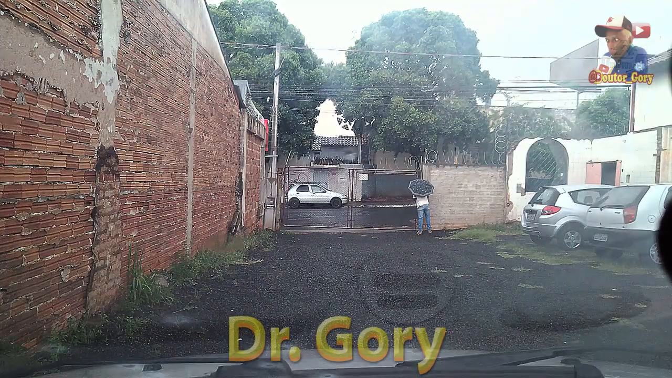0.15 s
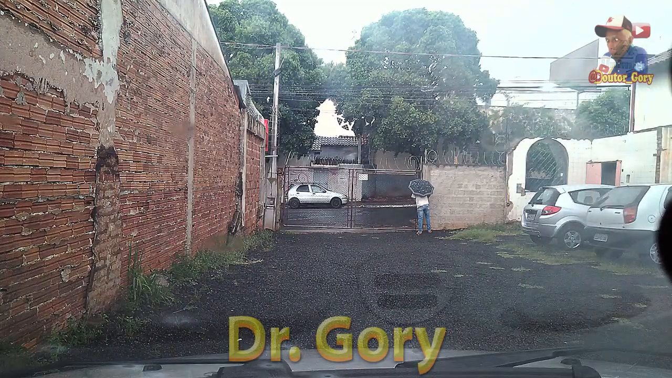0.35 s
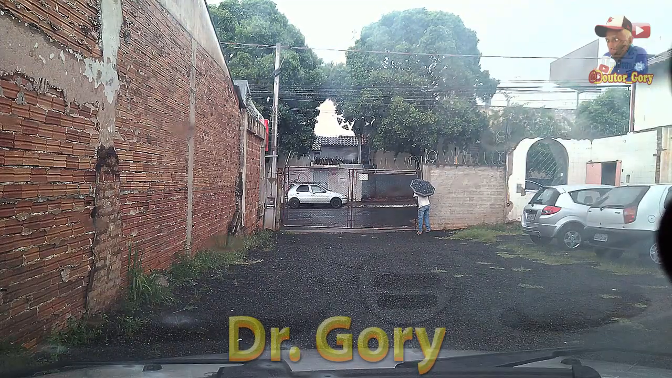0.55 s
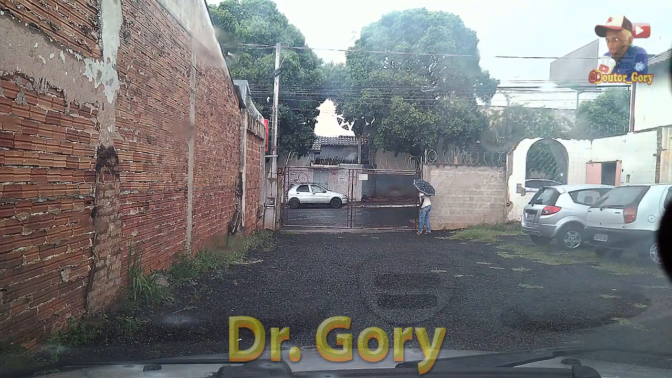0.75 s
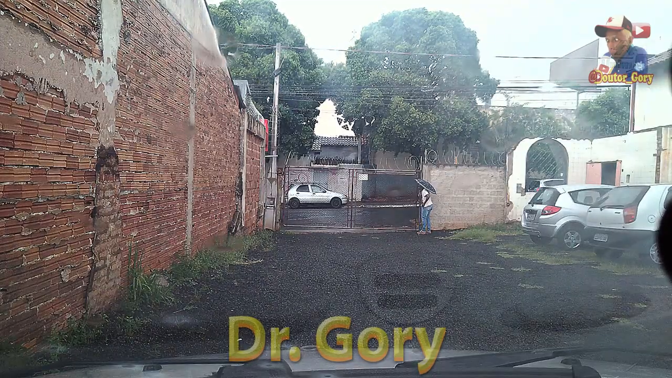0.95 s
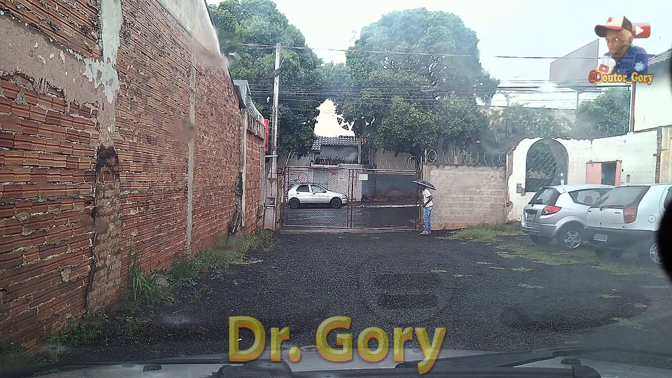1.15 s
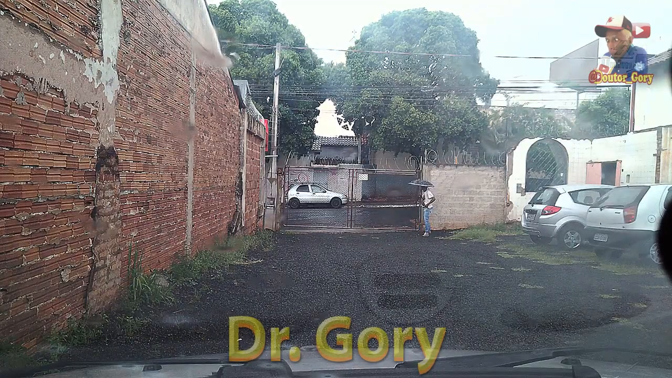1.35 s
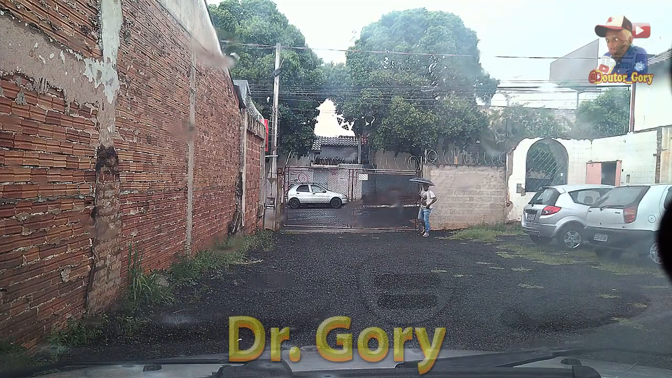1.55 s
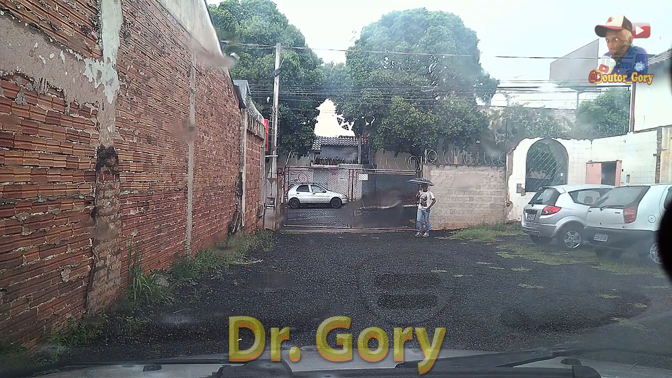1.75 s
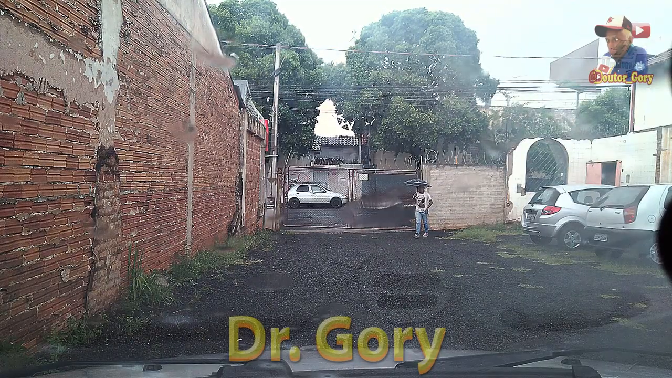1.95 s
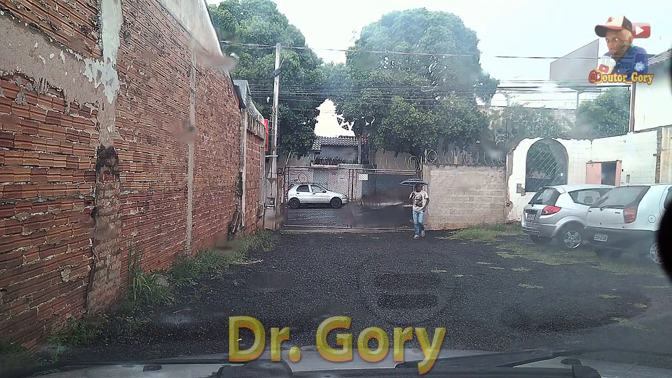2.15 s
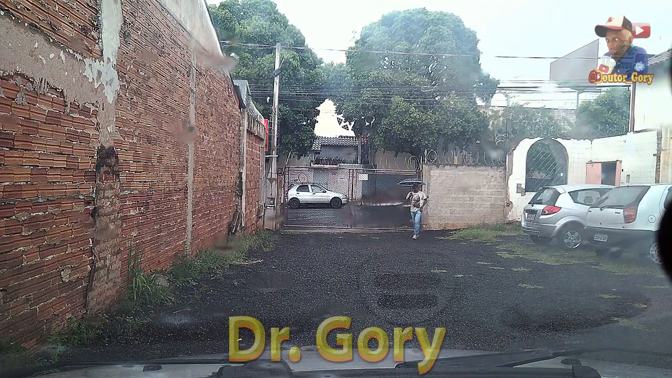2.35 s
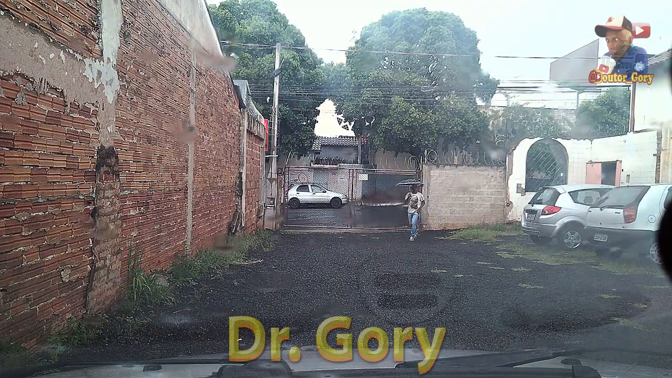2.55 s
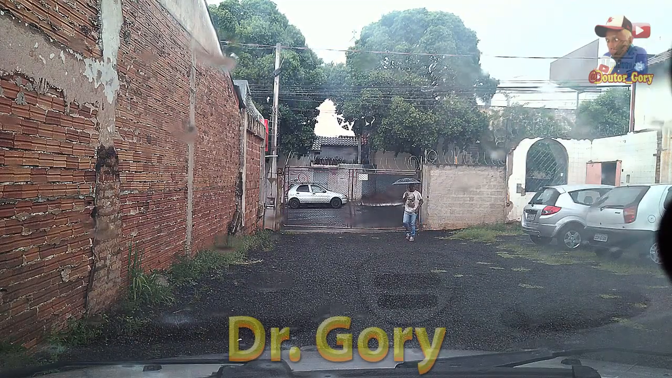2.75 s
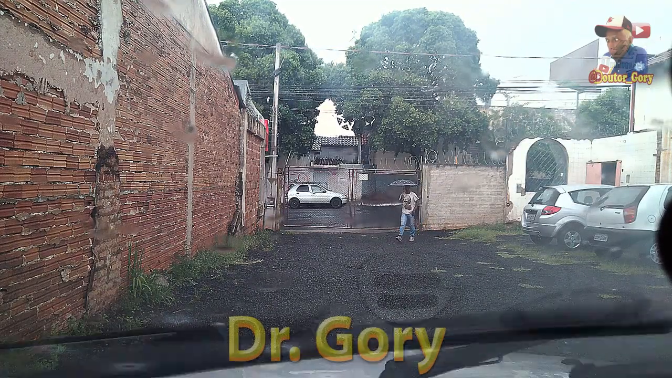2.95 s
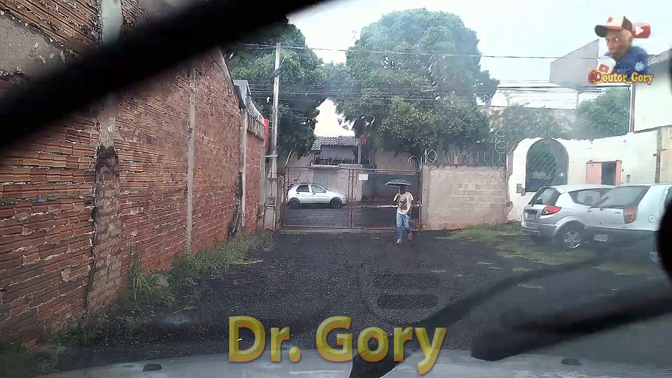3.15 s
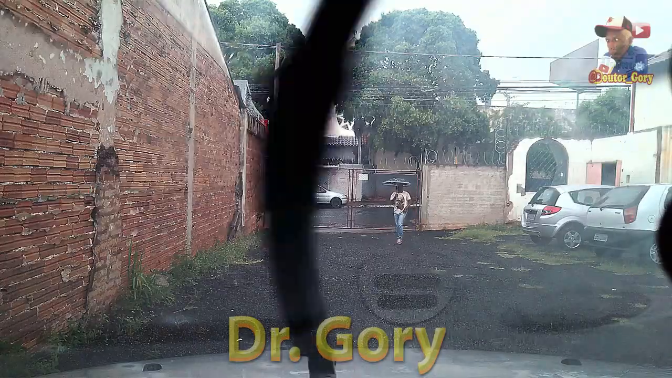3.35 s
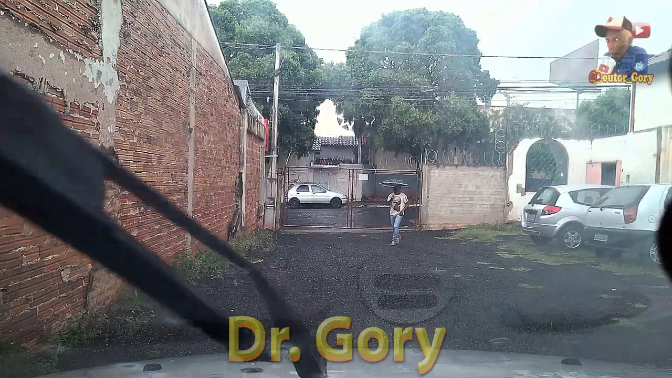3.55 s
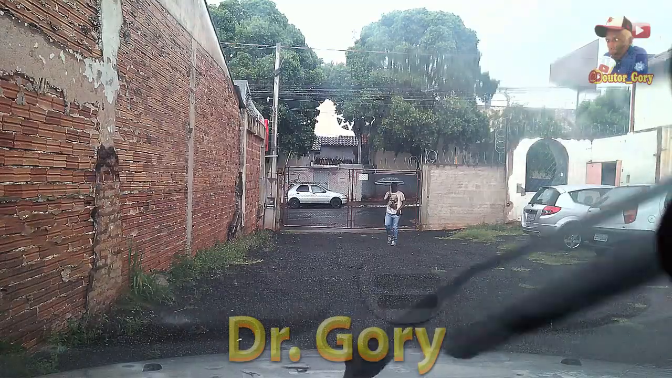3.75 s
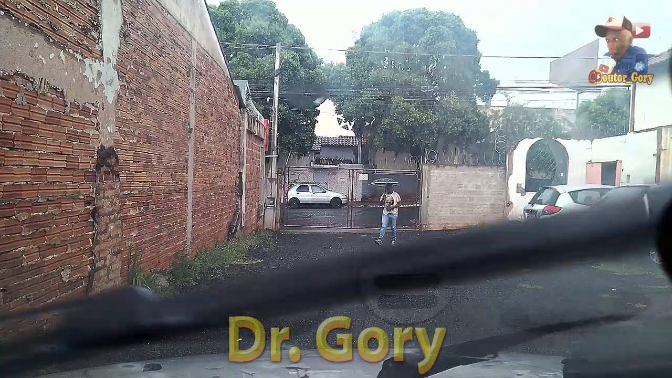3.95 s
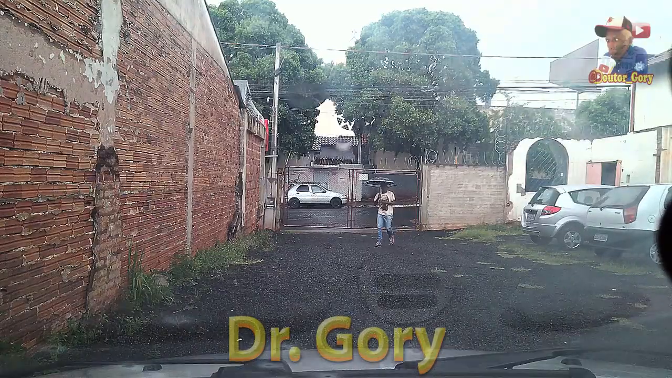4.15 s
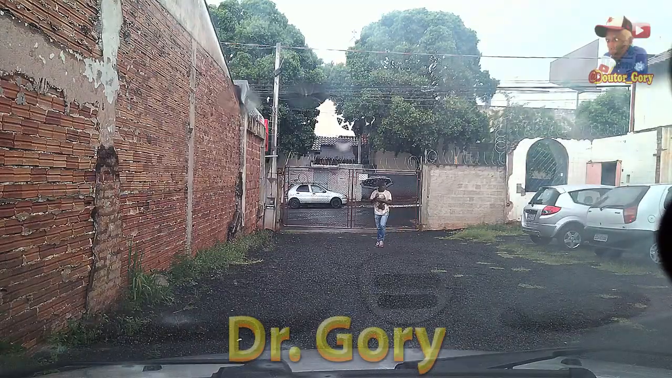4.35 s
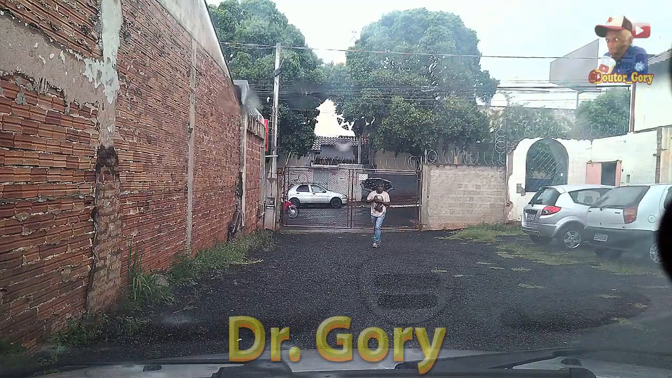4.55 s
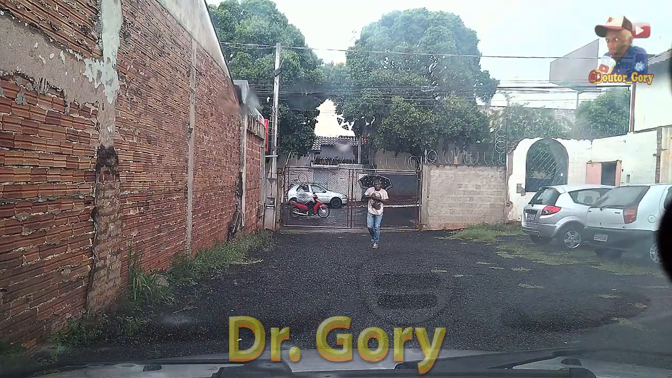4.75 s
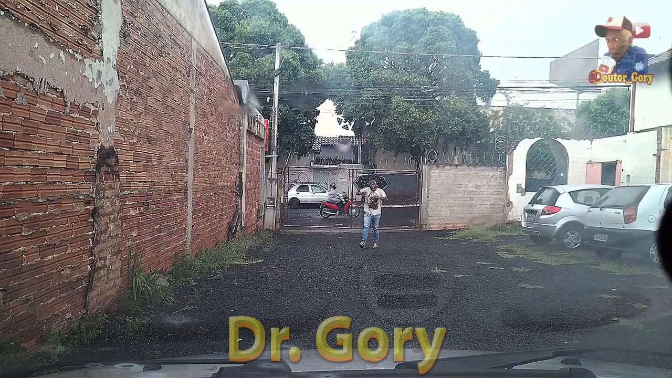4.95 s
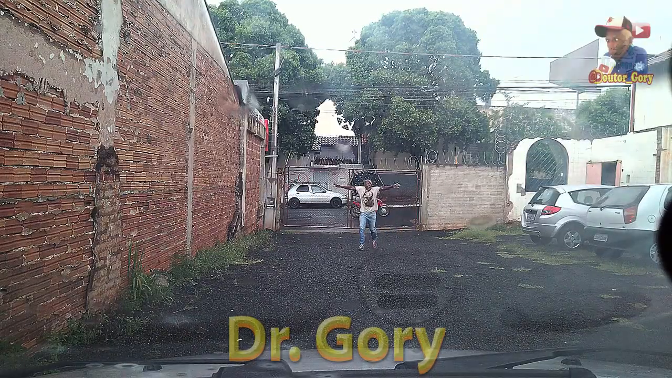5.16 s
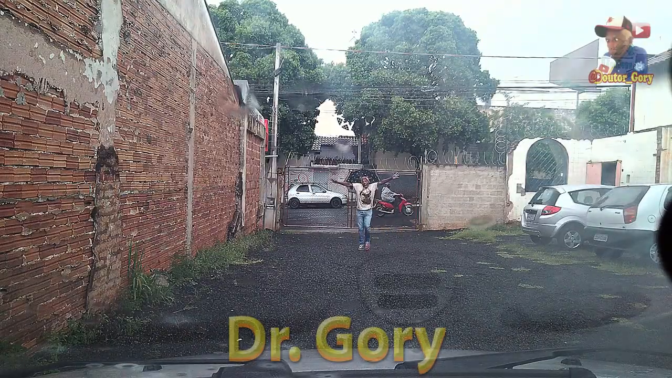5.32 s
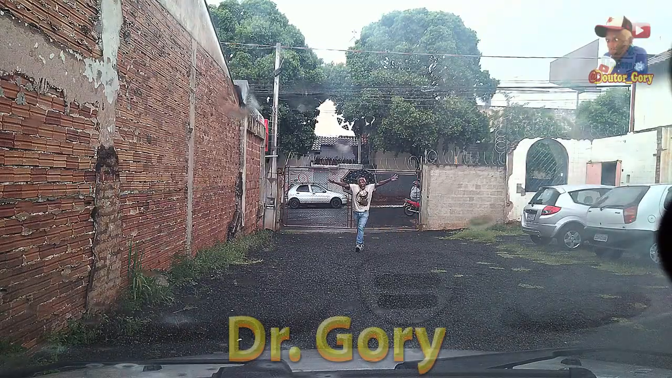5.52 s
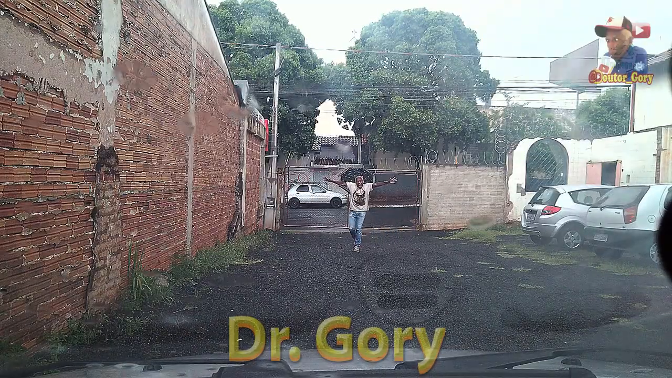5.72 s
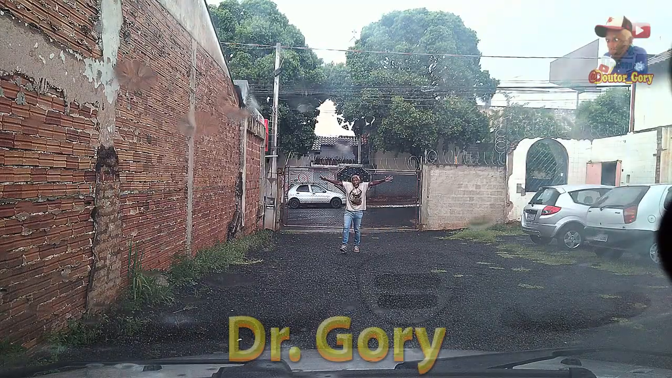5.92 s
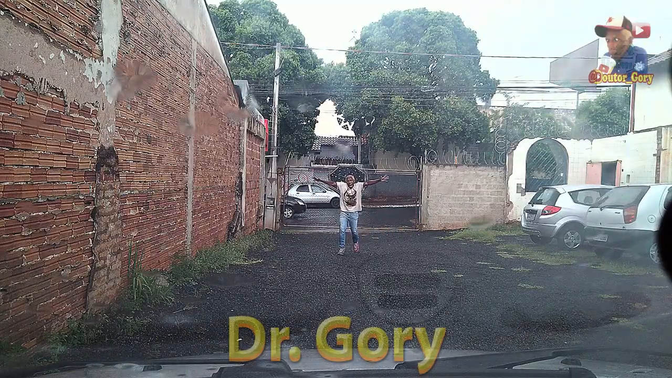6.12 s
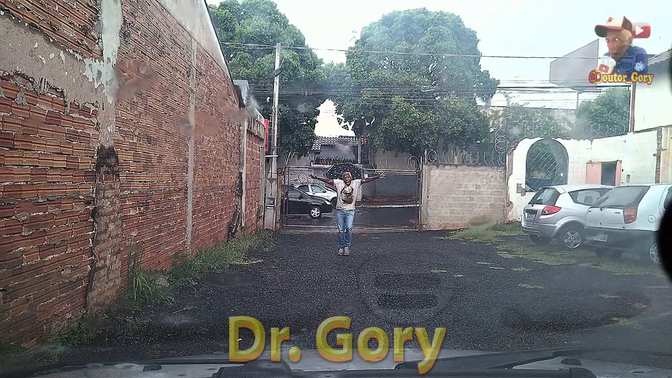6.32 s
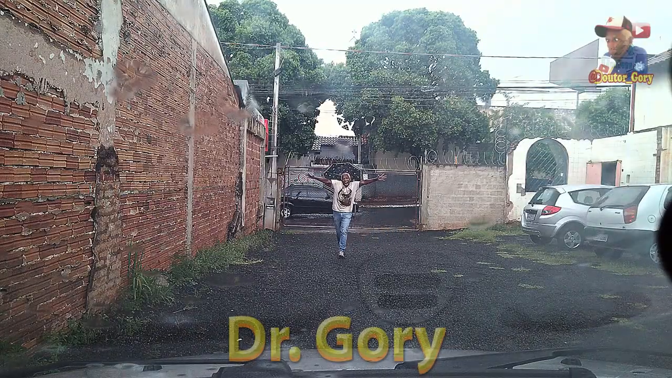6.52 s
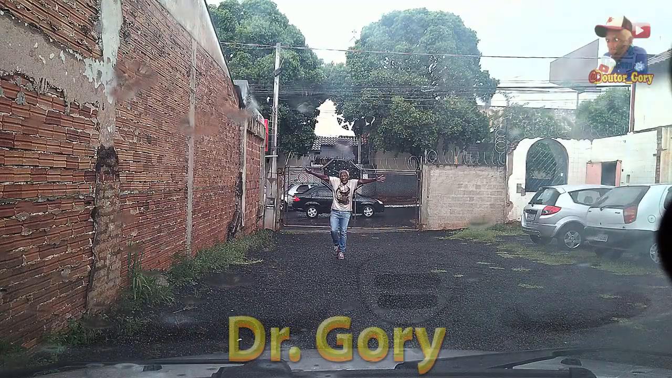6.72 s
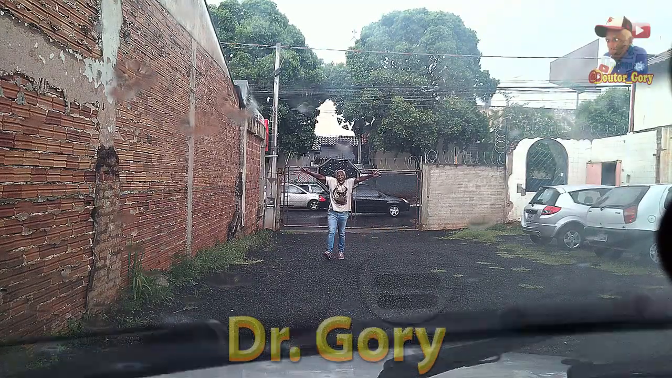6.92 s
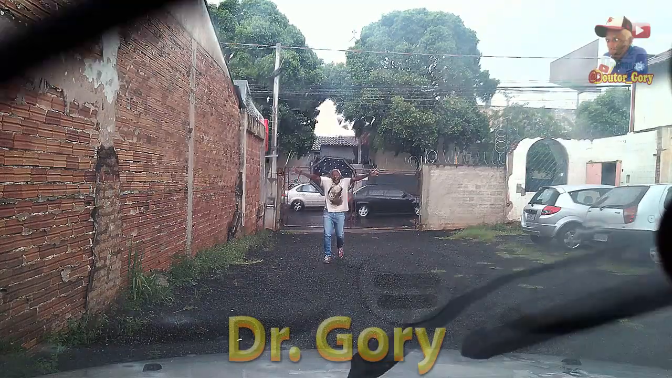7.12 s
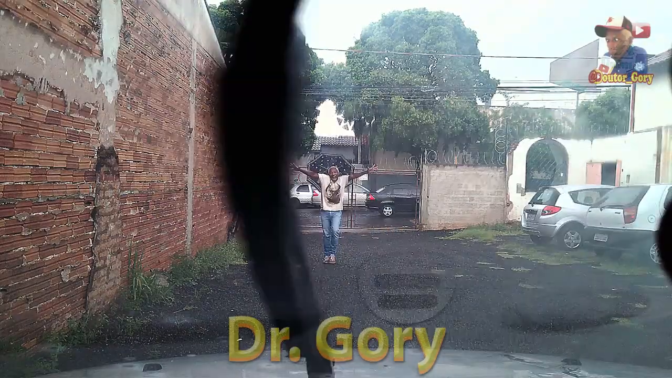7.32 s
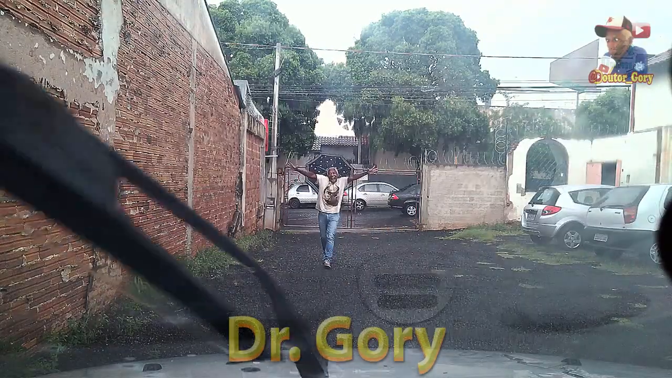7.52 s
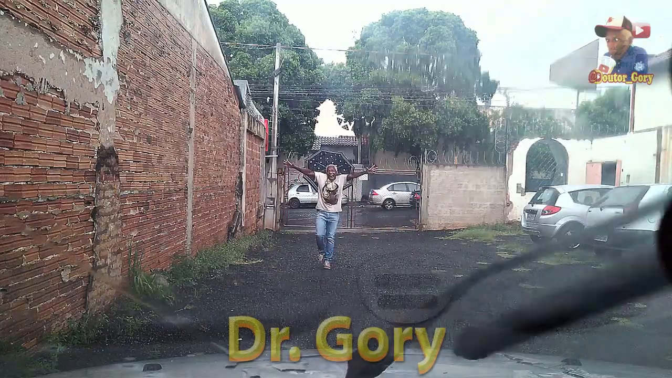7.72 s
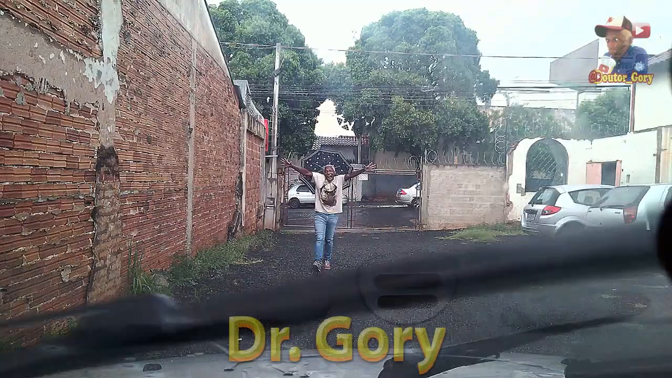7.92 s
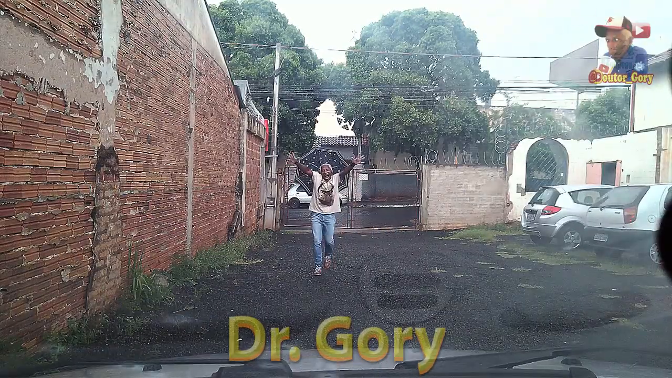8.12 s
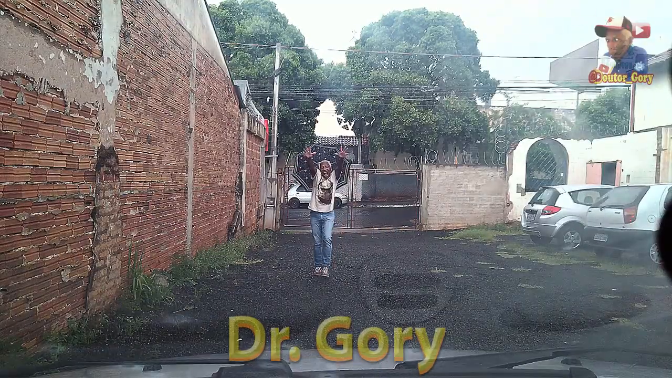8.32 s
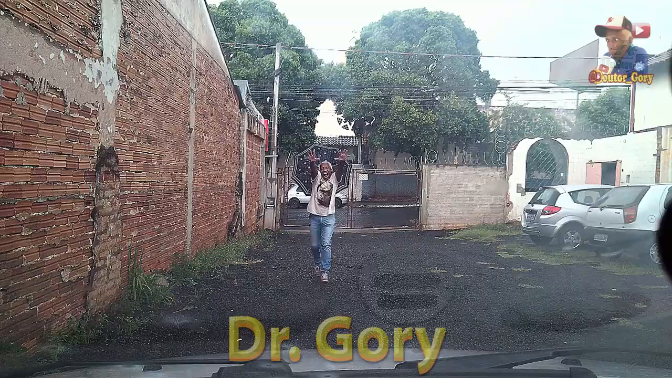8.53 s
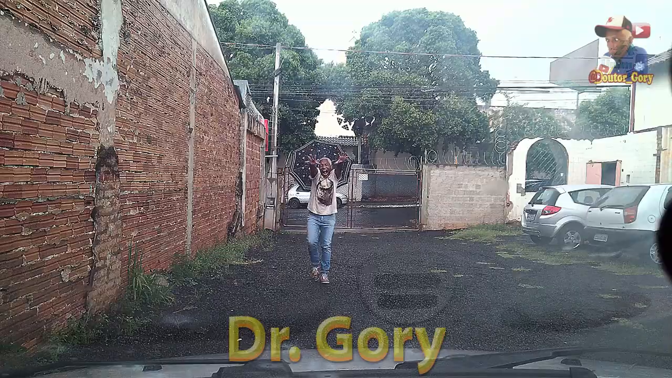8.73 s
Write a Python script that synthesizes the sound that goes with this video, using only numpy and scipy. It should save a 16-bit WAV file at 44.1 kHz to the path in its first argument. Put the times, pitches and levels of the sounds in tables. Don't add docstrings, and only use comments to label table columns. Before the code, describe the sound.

Heard from inside a small padded parked car: a steady dull rain wash, single drops thudding on the roof and ticking on the windshield, over a faint thin fan hum. A wiper sweep ends right at the start with a low thump; two more follow about four seconds apart, each with a relay tick, motor groan, juddering wet rubber, short squeaks and knocks at the turn.

```python
import sys
import numpy as np
from scipy import signal
from scipy.io import wavfile
from scipy.ndimage import uniform_filter1d

SR = 44100
rng = np.random.default_rng(int(sys.argv[2]) if len(sys.argv) > 2 else 0)


def transcribe(signal):
    frames = np.atleast_2d(signal).T
    limited = np.clip(frames, -1, 1)
    pcm = np.round(limited * 32767).astype(np.int16)
    wavfile.write(sys.argv[1], SR, pcm)


def volts(x):
    e = np.asarray(x, float) / 20
    return 10 ** e


N = 391608


def rms_one(x):
    return x / np.sqrt(np.mean(x ** 2) + 1e-20)


def during(x, fade):
    t = np.arange(x.shape[-1]) / SR
    return x * np.clip(np.minimum(t, t[::-1]) / fade, 0, 1)


def at_hz(points, hz):
    rows = np.array(points, float)
    return np.interp(np.log(hz), np.log(np.maximum(rows[:, 0], 1)), rows[:, 1])


def panned(x, pan_db):
    return np.array([x * volts(pan_db / 2), x * volts(-pan_db / 2)])


def bandpass(order, low_hz, high_hz):
    return signal.butter(order, [low_hz, high_hz], "band", fs=SR, output="sos")


def drift(rate):
    r = np.exp(-80 * np.pi * rate / SR)
    slow = signal.lfilter([1], [1, -2 * r, r * r], rng.standard_normal(N // 40 + 2002))[2000:]
    return np.interp(np.arange(N) / 40, np.arange(len(slow)), rms_one(slow))


def ring(clicks, hz, t60):
    r, w = volts(-60 / (t60 * SR)), 2 * np.pi * hz / SR
    return signal.lfilter([0, np.sin(w)], [1, -2 * r * np.cos(w), r * r], clicks + 1e-18)


def resonance(x, hz, width):
    r = np.exp(-np.pi * width / SR)
    poles = [1, -2 * r * np.cos(2 * np.pi * hz / SR), r * r]
    return signal.lfilter(np.array([1, 0, -1]) * (1 - r * r) / 2, poles, x)


def small_drops(per_s, spread_db, pan_db):
    born = rng.random(N) < per_s / SR
    energy = born * volts(2 * spread_db * np.minimum(rng.exponential(1, N), 2.5))
    return panned(energy, 2 * pan_db * rng.standard_normal(N)) / energy.mean()


def clear_drops():
    # (time [s], peak [dB], left-right [dB])
    dull = [(0.4304, -38, 1.5), (0.5615, -38, 4), (0.6524, -46, -1), (0.756, -41, 3.5), (1.1835, -38.5, 2),
            (1.2788, -37.5, -1), (1.5264, -35.5, 0), (1.577, -36, 0), (1.839, -41, 2), (2.32, -36.5, -0.5),
            (2.581, -40, -1), (2.812, -33.5, 2), (2.866, -36.5, 2), (3.2725, -36, 5), (3.6016, -53, -5),
            (3.8232, -38.5, 7), (3.9875, -40.5, 2), (4.0343, -38, -3.5), (4.1608, -37, 4), (5.248, -42, 9),
            (5.6992, -34, 0)]
    # (time [s], peak [dB], left-right [dB])
    bright = [(0.2049, -40, 0), (0.9317, -39.5, -1), (0.9991, -51, 7), (1.509, -45.5, 6), (1.762, -53, 4),
              (2.7663, -47, 14), (3.3814, -46, 5), (3.4185, -38.5, -3.5), (3.7915, -45, 1),
              (3.9367, -49, 6), (4.549, -42.5, 5), (4.602, -41, 1), (5.3738, -37, 0.5), (5.4318, -42.5, 6),
              (5.534, -36.5, 2), (5.5924, -38.5, 3), (5.7301, -35.5, -2), (5.778, -37.5, 1),
              (5.8755, -38, -1), (5.941, -41, -5), (5.9908, -36.5, 0.5), (6.0852, -40.5, -1),
              (6.1942, -42, 0), (6.453, -40.5, -4), (6.6285, -50, 0), (7.658, -42, -2.5), (7.714, -44, -3),
              (7.8795, -31, 2), (8.4718, -34, 1), (8.7041, -37.5, -1)]
    # (time [s], peak [dB], highs [dB], left-right [dB])
    specks = [(0.2185, -38, -10.5, -1), (0.515, -44, -14, 0), (0.61, -50, -13, 0), (0.69, -40, -13, -0.5),
              (1.054, -57, -8, -1), (1.621, -38.5, -12, 1), (1.8056, -54, -11, 8), (2.879, -38, -20, -1),
              (3.495, -42, -11, 3), (3.705, -43, -11.5, -2), (4.628, -59, -8, -3.5), (5.318, -41, -14, 0),
              (5.574, -46.5, -19, 0), (5.61, -46, -8, -3), (6.002, -32, -13.5, -1), (6.1709, -44, -10.5, 7),
              (6.2996, -48.5, -10, 4), (6.465, -33, -13.5, 1), (6.7301, -51, -17.5, 4),
              (6.848, -41.5, -27, 0), (7.231, -41, -11, 2), (7.425, -38, -8.5, 0), (7.492, -46, -13, -1),
              (7.757, -36, -16.5, 0), (8.7626, -56, -10, 1.5)]
    # (time [s], peak [dB])
    splashes = [(0.799, -36), (0.82, -35.5), (0.8375, -40.5), (1.398, -44), (4.37, -38), (4.516, -61),
                (5.168, -40.5), (5.442, -34), (5.567, -36), (7.307, -38.5), (7.3537, -60), (7.41, -38.5),
                (7.7407, -36), (7.907, -38), (8.3727, -39), (8.421, -35), (8.566, -39), (8.6265, -39),
                (1.077, -39.5), (1.238, -36.5), (2.173, -37.5), (4.662, -35.5), (4.767, -36.5),
                (5.003, -35), (5.129, -35.5), (5.301, -40.5), (5.49, -45), (5.895, -33), (7.545, -39),
                (7.665, -41)]
    rows = [(s, db, -13, pan_db, 0) for s, db, pan_db in dull]
    rows += [(s, db, -11.5, pan_db, 0) for s, db, pan_db in bright]
    rows += [(*row, 0) for row in specks]
    rows += [(s, db, -13, 1, 1) for s, db in splashes]
    return np.transpose(rows)


def rain():
    # (time [s], patter [dB], rumble [dB])
    swells = [(0.3, -52.5, -52.5), (1, -52.5, -58), (1.7, -50.5, -52), (2.3, -54.5, -56.5), (3.5, -53, -45),
              (4.498, -53, -51.5), (5.1, -52, -52), (5.8, -52, -53.5), (6.4, -51.5, -49.5),
              (7.4, -50, -41.5), (8.1, -53.5, -46.5), (8.6, -51, -49.5)]
    # (frequency [Hz], density [dB per Hz])
    wash = [(18, -36), (30, 2), (144, 3.5), (214, -13.5), (423, -6), (977, -20.5), (2260, -27),
            (4240, -34.5), (7940, -45.5), (12400, -40), (14500, -58.5), (15700, -73)]
    # (frequency [Hz], density [dB per Hz])
    patter = [(200, -19.5), (400, -15.5), (750, -15), (1000, -19), (2300, -23), (4200, -28.5),
              (6500, -39.6), (11000, -45), (15700, -48.5)]
    # (frequency [Hz], t60 [s])
    roof_t60 = [(300, 0.23), (2000, 0.094), (5000, 0.062), (12000, 0.076)]
    # (frequency [Hz], likeness [-1 to 1])
    likeness = [(50, 0.94), (120, 0.94), (350, 0.82), (700, 0.31), (1200, -0.25), (3000, 0.035),
                (12000, -0.13)]
    # (frequency [Hz], left-right [dB])
    lean = [(60, 1), (300, 2.5), (2000, 1), (5000, 1.5), (9000, 0)]
    wash_db, flicker_db = -49, 1.6
    splash_spread_s = 0.007

    t = np.arange(N) / SR
    s, patter_db, rumble_db = np.transpose(swells)
    rumble_db = np.interp(t, s, rumble_db) + 48.0
    small = small_drops(per_s=240.0, spread_db=2.9, pan_db=0.5) * volts(2 * np.interp(t, s, patter_db))
    s, peak_db, high_db, pan_db, soft = clear_drops()
    at = (s * SR).astype(int)
    hard = np.ones(N)
    hard[at] = 1 - soft
    spread = np.exp(-1 / (splash_spread_s * SR))
    colour = rng.standard_normal((len(s), 24))
    edges = 30 * 2 ** np.arange(0, 9.1, .5)
    white, gust, out = rng.standard_normal((2, 2, N)), drift(2.5), 0
    for k, (low, high) in enumerate(zip(edges, edges[1:])):
        hz, band = np.sqrt(low * high), bandpass(2, low, high)
        mid, side = signal.sosfilt(band, white[k % 2])
        alike = np.clip(at_hz(likeness, hz), -1, 1)
        noise = np.sqrt(1 + alike) * mid + np.sqrt(1 - alike) * side * [[1], [-1]]
        power = volts(2 * (wash_db + at_hz(wash, hz) + 20.0 + 0.59 * gust + flicker_db * drift(7.1)))
        tick = 0
        if hz < 110:
            power = power * volts(2 * rumble_db)
        if hz > 170:
            keep = volts(-120 / (at_hz(roof_t60, hz) * SR))
            swell = np.exp(-hz / (2.5 * SR))
            bright = np.clip(np.log2(hz / 1500) / 0.52, -.5, 1.3)
            big = np.zeros((2, N)) + 1e-12
            big[:, at] = panned(volts(peak_db + bright * (high_db + 13.5) + 2.0 * colour[:, k]), pan_db)
            splash = signal.lfilter([1 - spread], [1, -spread], big ** 2 * (1 - hard) + 1e-24)
            kicks = small * (1 - keep) * volts(2 * 8.63)
            kicks = kicks + volts(2 * 2.46) * (big ** 2 * hard + volts(2.0) * splash)
            ringing = signal.lfilter([1 - swell], np.convolve([1, -keep], [1, -swell]), kicks)
            power = power + ringing * volts(2 * at_hz(patter, hz) + 2 * 18.57)
            tick = signal.sosfilt(band, big * hard + 1e-12) * volts(at_hz(patter, hz) + 40.5)
        ears = volts(at_hz(lean, hz) * np.array([[.5], [-.5]]))
        out = out + (noise * np.sqrt(power) + tick) * ears
    return out


def fan():
    phase = 2 * np.pi * np.cumsum(263.8 + 0.63 * drift(2.44)) / SR
    return panned(np.sqrt(2) * volts(-58 + 0.73 * drift(3.7)) * np.sin(phase), -1.4)


def over_sweeps(rows):
    starts = [
        -1.19,
        2.785,
        6.764,
    ]
    # (motor [dB], drag [dB])
    efforts = [
        (2.5, 2),
        (-1.5, 0.3),
        (-1, 0.6),
    ]
    t, (s, *columns) = np.arange(N) / SR, np.transpose(rows)
    for start, gains_db in zip(starts, efforts):
        first, last = round((start + s[0]) * SR), round((start + s[-1]) * SR)
        span = slice(max(first, 0), min(last, N))
        yield span, [np.interp(t[span] - start, s, c) for c in columns], gains_db


def motor():
    # (time after start [s], pitch [Hz], tone [dB])
    course = [(0.0, 91.1, -41), (.13, 58.93, -37), (.25, 89.57, -31.5), (.48, 59.66, -48), (.68, 80.3, -43),
              (.9, 58.15, -39), (1.26, 60, -52.5), (1.44, 92.4, -40), (1.62, 57, -57)]
    out, wobble, throb = np.zeros(N), drift(22), drift(39)
    for span, (hz, level_db), (gain_db, _) in over_sweeps(course):
        phase = 2 * np.pi * np.cumsum(hz * (1 + 0.058 * wobble[span])) / SR
        tone = np.sqrt(2) * volts(level_db + gain_db + 2.7 * throb[span]) * np.sin(phase)
        out[span] = during(tone, .01)
    return panned(out, 1.9)


def friction():
    # (time after start [s], drag [dB])
    drag = [(0.0, -57), (.03, -33.5), (.19, -35.5), (.45, -39), (.56, -38.5), (.78, -36.5), (.95, -50.5),
            (1.15, -40), (1.63, -52.5)]
    # (peak time [s], judder [dB], bright part [dB], t60 [s])
    judders = [(0.004, -40.5, -46, 0.4), (0.25, -30.5, -33, 0.24), (2.99, -34, -47, .3),
               (3.021, -24, -31, 0.32), (3.094, -21, -27.5, 0.3), (3.13, -30.5, -25, 0.13),
               (3.44, -41, -42, 0.39), (3.52, -25.5, -35, 0.099), (3.628, -28, -39, 0.2),
               (4.222, -39, -36, 0.37), (6.784, -25.5, -42, 0.12), (6.988, -22, -24.5, 0.38),
               (7.09, -25.5, -29, 0.53), (7.183, -31.5, -29, 0.36), (7.41, -31, -33.5, 1),
               (7.599, -36.5, -38.5, 0.72), (8.198, -28, -33.5, 0.041)]
    bright_db, rise_db_per_s, bright_shorter = -10, 403, 2
    catch_s = 0.0082
    t, power = np.arange(N) / SR, np.full((2, N), 1e-12)
    for span, (drag_db,), (_, gain_db) in over_sweeps(drag):
        power[:, span] += during(volts(2 * (drag_db + gain_db + np.array([[0], [bright_db]]))), .0048)
    for s, low_db, high_db, t60 in judders:
        span = slice(max(round((s - .15) * SR), 0), round((s + .5) * SR))
        rise = rise_db_per_s * np.minimum(t[span] - s, 0)
        fall = 60 * np.maximum(t[span] - s, 0) / t60
        power[:, span] += volts(2 * np.array([low_db + rise - fall, high_db + rise - bright_shorter * fall]))
    return np.sqrt(uniform_filter1d(power, size=round(catch_s * SR)) + 1e-12)


def blades():
    # (frequency [Hz], width [Hz], level [dB])
    glass = [(144, 37, 0.5), (212.7, 17.8, 1.5), (272.3, 33, -5.5), (464, 210, 11.5), (576, 68, 12.5),
             (750, 103, 6.5), (980, 990, 0.5), (1210, 770, -3.5), (1720, 500, -15.5)]
    slips_per_s, hiss_db = 1500, -24
    slips = (rng.random((2, N)) < slips_per_s / SR) * rng.standard_normal((2, N)) * volts(2.6 * drift(32))
    slips = np.array([slips[0] + 0.5 * slips[1], slips[0] - 0.45 * slips[1]]) + 1e-18
    modes = [(-1) ** k * volts(db) * resonance(slips, hz, width) for k, (hz, width, db) in enumerate(glass)]
    low, high = friction()
    out = rms_one(sum(modes[:3])) * low * volts(-3.5) + rms_one(sum(modes[3:])) * high * volts(-4.5)
    soft_rubber = signal.butter(2, 2300, fs=SR, output="sos")
    hiss = rms_one(signal.sosfilt(bandpass(2, 1300, 3800), rng.standard_normal((2, N))))
    hiss = hiss * high * (high / high.max()) ** 0.5
    return (signal.sosfilt(soft_rubber, out) + volts(hiss_db) * hiss) * volts([[1.5], [-1.5]])


def knocks():
    # (time [s], peak [dB], frequency [Hz], t60 [s], left-right [dB])
    linkage = [(0.07, -31.5, 208, 0.091, 11), (0.223, -16.5, 99.4, 0.16, 2), (0.251, -11, 81, 0.03, 2),
               (2.792, -11.5, 123, 0.063, 1.5), (2.871, -21.5, 220, 0.14, 3), (3.201, -20.5, 345, 0.05, 5),
               (3.618, -18.5, 163, 0.07, 0), (3.643, -18, 91.7, 0.25, 2.5), (4.216, -27, 140, 0.093, 3),
               (6.772, -9.5, 134, 0.066, -1), (6.841, -27.5, 169, 0.08, 11), (6.985, -10.5, 220, 0.069, 13),
               (7.003, -6.5, 142, 0.039, -12), (7.591, -14.5, 276, 0.065, -4), (7.63, -18, 91, 0.18, 0.5),
               (7.89, -26.5, 197.3, 0.25, -3), (8.056, -23, 91.8, 0.27, 5), (0.004, -27, 58, 0.13, 5),
               (3.508, -29, 410, 0.043, 0), (3.622, -23, 457, 0.046, 9), (3.67, -32, 67, 0.28, 0),
               (8.2, -34, 610, .07, -7), (7.483, -26, 400, 0.067, -3.5), (7.357, -26.5, 750, 0.053, 6),
               (2.985, -23.5, 297, .06, 0), (3.058, -13.5, 170, .07, 4), (7.184, -25, 520, 0.065, 6),
               (3.434, -31, 540, .06, -3), (3.09, -24, 607, 0.065, 7), (3.005, -23.5, 614, .06, 4),
               (6.967, -24.5, 560, .07, 3), (7.665, -20.5, 70, 0.16, 2), (8.185, -22, 145, 0.25, 2),
               (8.207, -22, 95, 0.24, 3), (7.178, -29, 880, .07, 3), (6.774, -20.5, 300, 0.059, 2),
               (6.885, -25.5, 290, .1, 4), (3.076, -15, 260, .05, 4)]
    # (time [s], peak [dB], frequency [Hz], t60 [s], left-right [dB])
    thuds = [(0.432, -29, 500, .06, 6), (0.651, -38, 650, .05, 1.5), (0.689, -33, 700, .05, 1),
             (0.839, -28.5, 612, 0.066, 1), (2.32, -35, 695, .05, 2.5), (4.158, -34, 645, 0.044, 2),
             (5.246, -35, 795, .04, 3), (5.535, -31.5, 750, .05, 3), (5.697, -34, 705, .05, 2),
             (6.193, -37, 650, 0.042, 2.5), (7.875, -33, 700, 0.055, 1.5)]
    out, t = np.zeros((2, N)), np.arange(round(.25 * SR)) / SR
    swell = 1 - np.exp(-t / 0.0019)
    for s, db, hz, t60, pan_db in [*linkage, *thuds]:
        upper = 0.24 * np.sin(2 * np.pi * 2.82 * hz * t) * volts(-60 * t / t60)
        tone = np.sin(2 * np.pi * hz * t) + upper
        out[:, round(s * SR):][:, :len(t)] += panned(volts(db - 5.0 - 60 * t / t60) * swell * tone, pan_db)
    return out


def needles():
    # (time [s], peak [dB], frequency [Hz, sounded 1.25 times higher], left-
    # right [dB])
    clear = [(0.2044, -45, 3240, 2.0), (0.2199, -39, 3070, -2.0), (0.4284, -33, 4260, 4.0),
             (0.6524, -44, 3040, 0.5), (0.7582, -36.5, 3170, 4.5), (0.8404, -44, 3400, 1.5),
             (0.9315, -39, 3700, 0.0), (1.054, -44, 3420, 2.5), (1.1847, -40, 3220, 2.0),
             (1.2767, -36, 3780, 2.5), (1.5095, -39, 4410, 4.0), (1.6202, -44, 3190, 3.0),
             (1.7622, -37, 4270, 3.0), (1.8068, -42.5, 3490, 2.5), (2.1745, -40, 3050, 2.0),
             (2.3194, -43, 3240, 1.5), (2.582, -40.5, 3230, -0.5), (3.4181, -42, 4170, -1.0),
             (4.0355, -41, 3010, -1.0), (4.1589, -42, 3150, 0.5), (4.5156, -43, 4160, 3.0),
             (4.5476, -38.5, 4210, 4.5), (5.1701, -43, 3170, 1.0), (5.247, -30, 3430, 5.0),
             (5.3752, -37, 4040, 6.0), (5.3804, -35.5, 3330, 4.5), (5.4354, -40, 3770, 2.5),
             (5.444, -39, 4100, 1.0), (5.5707, -40, 3330, 3.5), (5.6974, -43, 4310, 0.5),
             (5.7299, -38, 3740, 1.0), (5.7788, -41, 4300, 2.0), (5.898, -39, 3330, 3.0),
             (5.9429, -35, 3420, 1.0), (5.9908, -37.5, 3450, 0.5), (6.0858, -45, 3510, 3.0),
             (6.1712, -41, 3760, 2.0), (6.1943, -39, 3740, 0.5), (6.3001, -42, 4220, 3.0),
             (6.4552, -40, 3980, 2.0), (7.0354, -31.5, 3930, 2.0), (7.7084, -44, 3120, 5.5),
             (7.712, -35, 3080, 1.5), (7.8094, -44, 4310, 2.5), (7.8768, -36, 3350, 3.5),
             (7.9054, -39, 3510, 1.5), (7.9458, -41, 3960, 3.5), (8.4721, -37, 3500, 3.5),
             (8.8209, -46, 3620, 3.0)]
    fine_per_s, fine_db, decay_s = 60, -54.5, .00032
    out, t = np.zeros((2, N + 300)), np.arange(200) / SR
    when, size, pitch, place = rng.random((4, round(fine_per_s * N / SR)))
    fine_level_db = fine_db - 2.5 * np.log(size + .05)
    fine = np.transpose([when * N / SR, fine_level_db, 2000 * 2.6 ** pitch, 16.0 * place - 6.5])
    for s, db, hz, pan_db in [*clear, *fine]:
        tick = panned(volts(db + 5) * np.sin(2.5 * np.pi * hz * t) * np.exp(-t / decay_s), pan_db)
        at, lag = int(s * SR) + 40, int(np.clip(3 * pan_db, -20, 20))
        out[0, at:at + 200] += tick[0]
        out[1, at + lag:at + lag + 200] += tick[1]
    return signal.sosfilt(bandpass(1, 1500, 11000), out[:, :N])


def relay():
    # (time [s], peak [dB])
    switching = [
        (0.258, -49),
        (2.7861, -45),
        (4.2336, -49.5),
        (6.762, -46),
        (8.208, -50),
    ]
    # (frequency [Hz], level [dB], t60 [s])
    case = [(2720, 0.5, 0.0016), (4000, 2.5, 0.003), (6220, -2.5, 0.0013), (9800, -0.5, 0.0011),
            (11100, -31, 0.025), (11570, -1.5, 0.0018)]
    clicks = np.zeros((2, N))
    chatter = rng.standard_normal((len(switching), 2, 800)) * np.exp(-np.arange(800) / 400.0)
    for (s, db), burst in zip(switching, chatter):
        clicks[:, round(s * SR):][:, :800] = volts(db - 6.5) * burst
    body = sum(volts(db) * ring(clicks, hz, t60) for hz, db, t60 in case)
    return body * volts([[-1.2], [1.2]])


def snaps():
    # (time [s], peak [dB], left-right [dB])
    heavy = [(0.428, -32.5, 17), (0.7587, -36.5, 9), (0.931, -34.5, 1), (0.9982, -36.5, 5),
             (1.277, -33.5, 11), (1.763, -36.5, 12), (2.5836, -41, -2), (4.547, -36.5, 5),
             (5.2479, -30.5, 5), (5.377, -33, 11), (5.834, -39, 1), (5.941, -34.5, 7), (5.9903, -39, 8),
             (6.4145, -42, 0), (7.036, -27.5, 10), (7.1418, -33, -3), (7.8764, -40, 1), (8.628, -32.5, -1),
             (8.706, -46, 5), (2.767, -41.5, 0), (7.7136, -34, 5), (8.4721, -36, 9), (2.54, -40, 4),
             (0.652, -45, 1), (6.194, -38, 1)]
    clicks, rings, t = np.zeros((2, N)) + 1e-18, np.zeros((2, N)), np.arange(1000) / SR
    for s, db, pan_db in heavy:
        at = round(s * SR)
        spatter = rng.standard_normal(1000) * np.exp(-t / 0.0016)
        clicks[:, at:at + 1000] += panned(volts(db - 4.5) * spatter, pan_db)
        clicks[:, at] += panned(volts(db + 3.5), pan_db)
        for hz, level_db, t60 in ((2200, -13, .014), (3400, -11, .008), (4400, -10, .008)):
            tone = np.sin(2 * np.pi * hz * (1 + 0.043 * rng.standard_normal()) * t)
            rings[:, at:at + 1000] += panned(volts(db + level_db - 60 * t / t60) * tone, pan_db)
    spike = signal.sosfilt(bandpass(2, 1200, 6000), clicks) + rings
    return spike - 0.16 * np.roll(spike, 55, axis=1) + 0.3 * np.roll(spike, 240, axis=1)


def squeaks():
    # (time [s], length [s], level [dB], first rate [slips/s], last rate [slips/s])
    tones = [
        [(2.98, 0.09, -20.5, 175, 145), (6.96, 0.087, -23, 164.2, 131)],
        [(3.068, 0.054, -26, 250, 243), (7.035, 0.076, -25, 204.4, 254)],
        [(3.295, 0.07, -36.5, 410, 370), (3.335, 0.065, -33.5, 425, 450), (7.26, 0.085, -41, 380, 500),
         (7.33, 0.06, -39, 460, 410), (7.05, .085, -42.5, 640, 920), (3.105, 0.052, -37.5, 590, 570),
         (3.43, .07, -46.5, 880, 930), (7.07, 0.053, -47.5, 1080, 1190), (3.0, .045, -36, 480, 580),
         (3.01, 0.033, -42, 720, 830)],
        [(3.432, .115, -22, 262.3, 257.2), (7.406, 0.11, -21, 258, 263.6)],
        [(7.168, 0.07, -23.5, 225, 295), (6.975, .055, -22.5, 240, 320)],
    ]
    # (share of length spent rising, overtones [dB], left-right [dB], final sag in pitch [0-1])
    kinds = [(.45, -14, 8, .03), (.6, -16, -1, 0), (.6, -21, 2.7, .04), (.25, -20, -5, .4), (.55, -17, -1, 0)]
    rise_db, fade_db, fade_bend = -16, -11, 1.4
    sag_from, overtone_fall_db = .66, 10
    out, wobble, flutter = np.zeros((2, N)), drift(40), drift(63)
    for (rising, upper_db, pan_db, sag), rows in zip(kinds, tones):
        for s, length, db, first_hz, last_hz in rows:
            span = slice(round(s * SR), round((s + length) * SR))
            share = np.linspace(0, 1, span.stop - span.start)
            hz = first_hz + (last_hz - first_hz) * share
            hz = hz * (1 - sag * np.maximum(share - sag_from, 0) / (1 - sag_from))
            rise = rise_db * (1 - share / rising) ** 2
            fade = fade_db * ((share - rising) / (1 - rising)).clip(0) ** fade_bend
            level_db = db + np.where(share < rising, rise, fade)
            phase = 2 * np.pi * np.cumsum(hz * (1 + (0.02 + hz / 40000) * wobble[span])) / SR
            upper = sum(volts(upper_db - overtone_fall_db * k) * np.sin((k + 2) * phase) for k in range(4))
            upper = upper * volts(3.2 * flutter[::-1][span])
            tone = np.sqrt(2) * volts(level_db + 1.4 * flutter[span]) * (np.sin(phase) + upper)
            out[:, span] += panned(during(tone, 0.011), pan_db)
    return out


def ducking():
    t, loud_db = np.arange(N) / SR, 20 * np.log10(friction()[0])
    over_db = np.maximum(loud_db + 43.0, 0) * 0.19
    held = np.maximum.accumulate(over_db + 4.05 * t) - 4.035 * t
    return volts(-uniform_filter1d(held, size=441))


def scene():
    wet = rain() + needles() + snaps()
    works = fan() + motor() + blades() + knocks() + relay() + squeaks()
    return wet * ducking() + works


def low_pass(x):
    return signal.sosfilt(signal.butter(12, 15500, fs=SR, output="sos"), x)


def record(dry):
    dry = dry + 1.47 * resonance(dry, 53.9, 8.8) + 0.48 * resonance(dry, 1468, 87)
    dry = signal.sosfilt(signal.butter(8, 39, "high", fs=SR, output="sos"), dry)
    dry = dry - 0.71 * resonance(dry, 7680, 3900)
    dry = signal.sosfilt(signal.butter(4, 14300, fs=SR, output="sos"), dry)
    return low_pass(dry)


dry = scene()
out = record(dry)
transcribe(out)
```